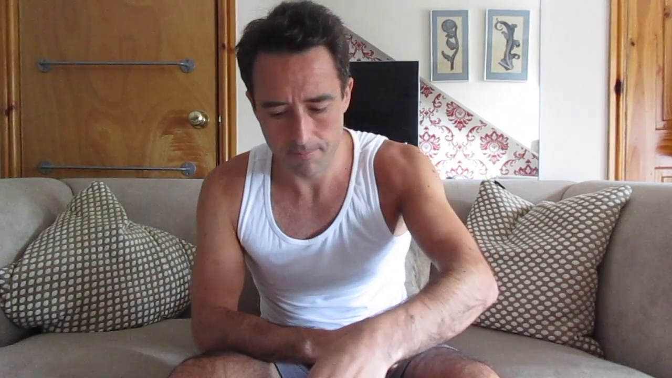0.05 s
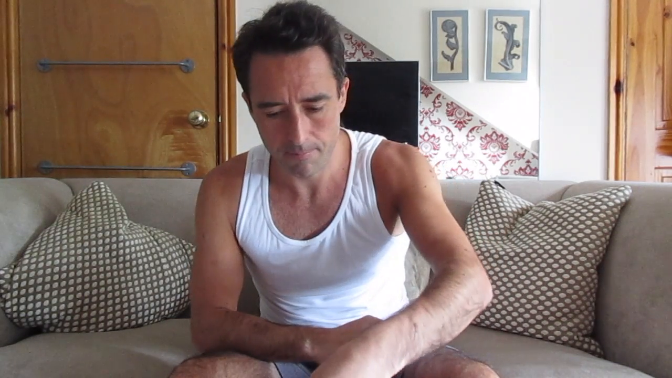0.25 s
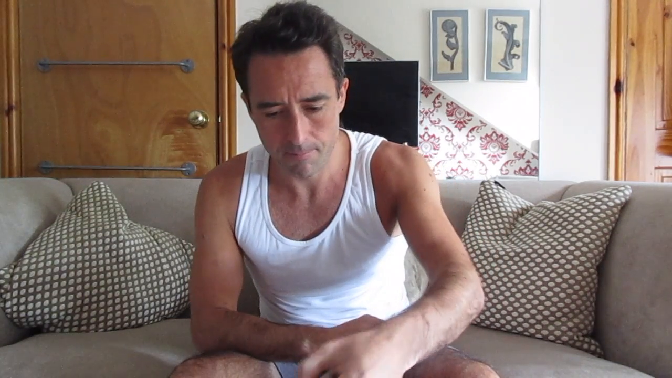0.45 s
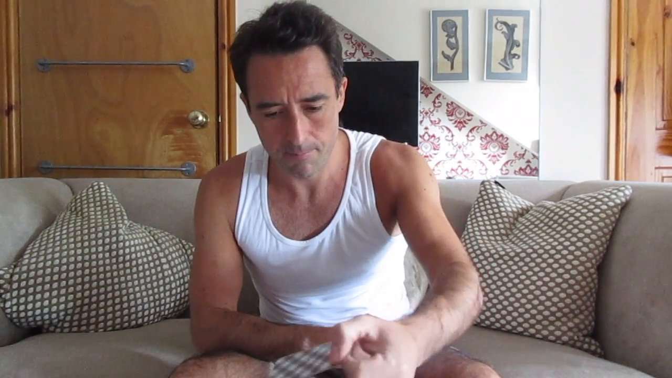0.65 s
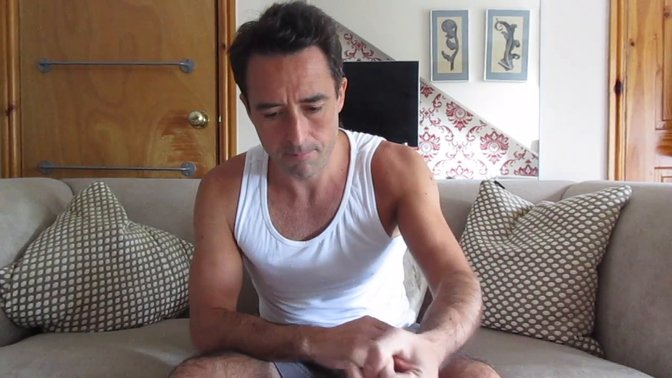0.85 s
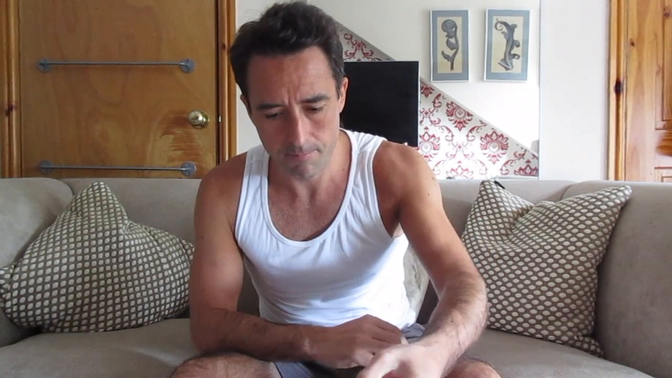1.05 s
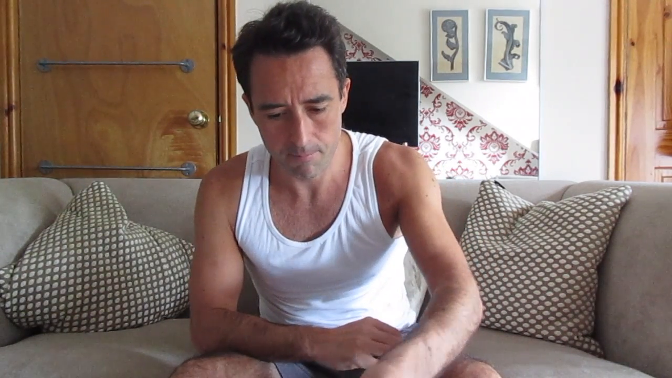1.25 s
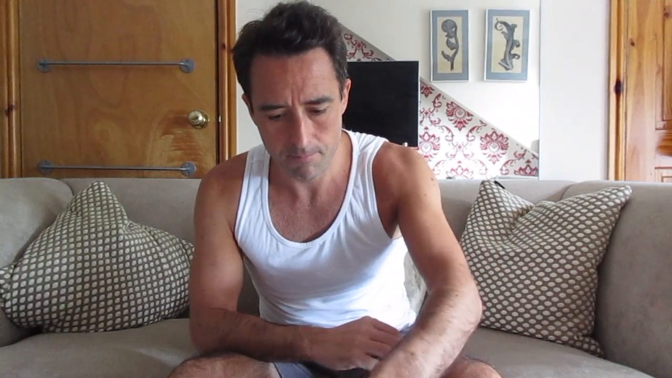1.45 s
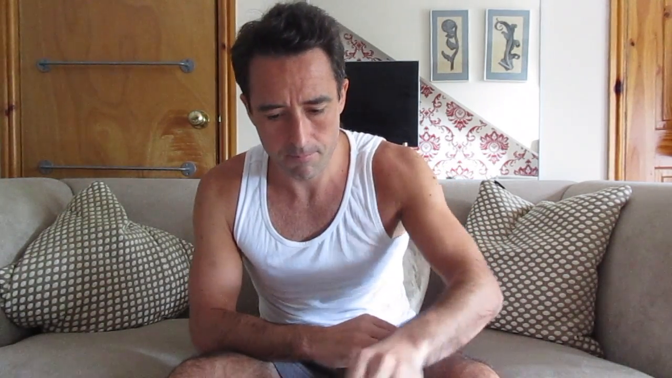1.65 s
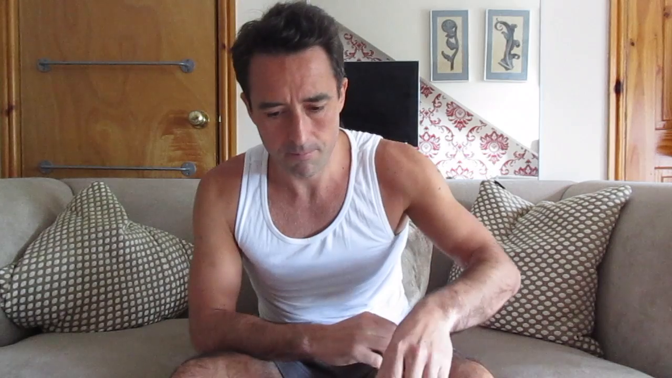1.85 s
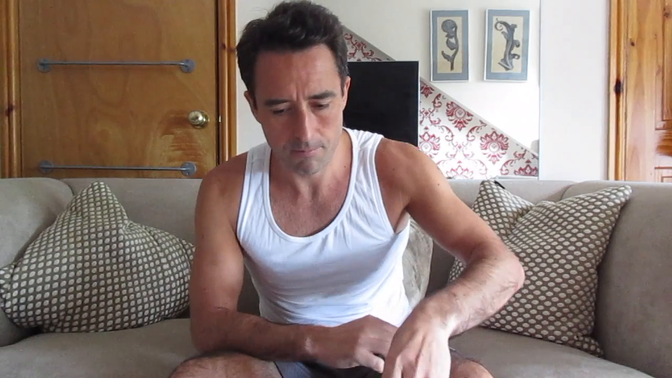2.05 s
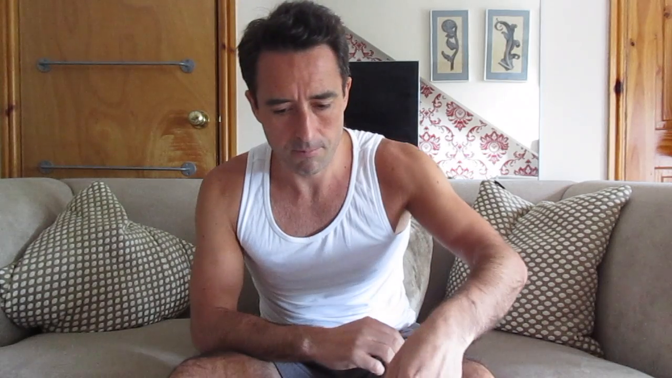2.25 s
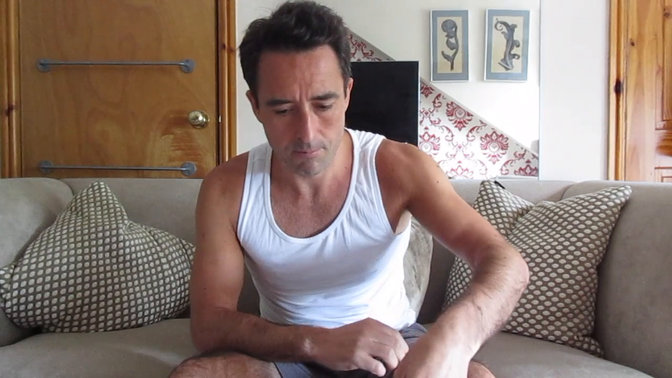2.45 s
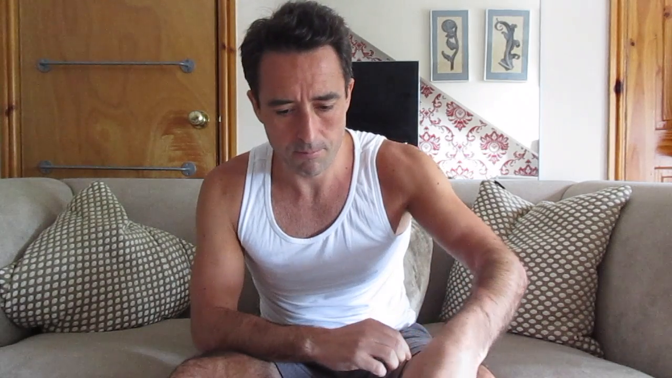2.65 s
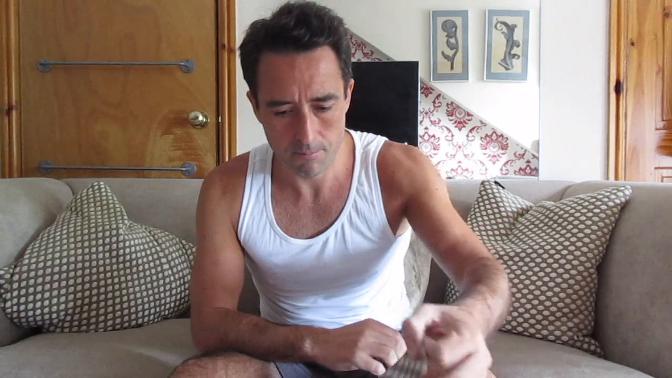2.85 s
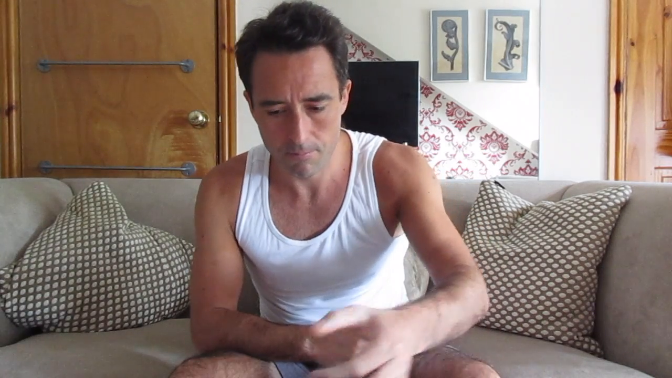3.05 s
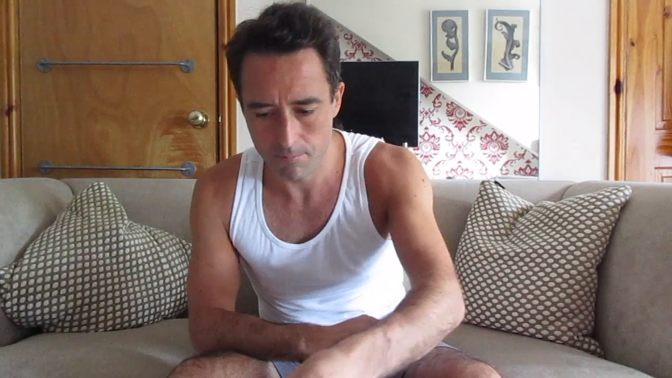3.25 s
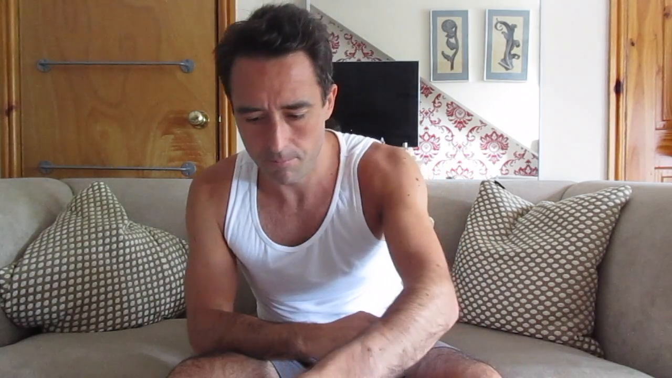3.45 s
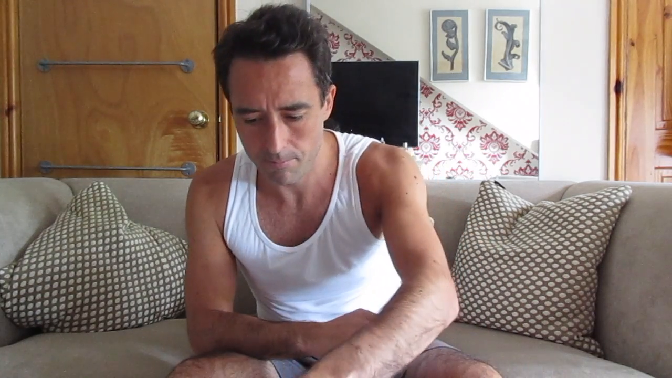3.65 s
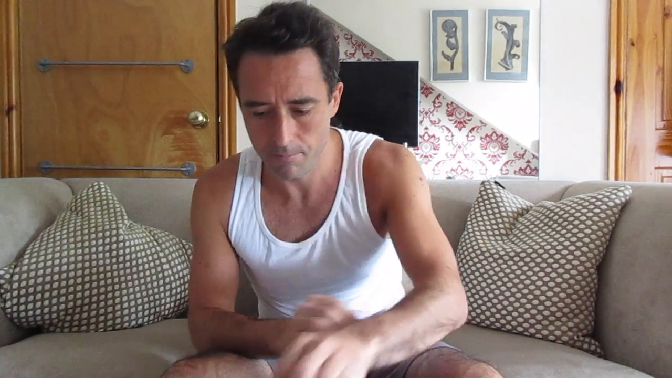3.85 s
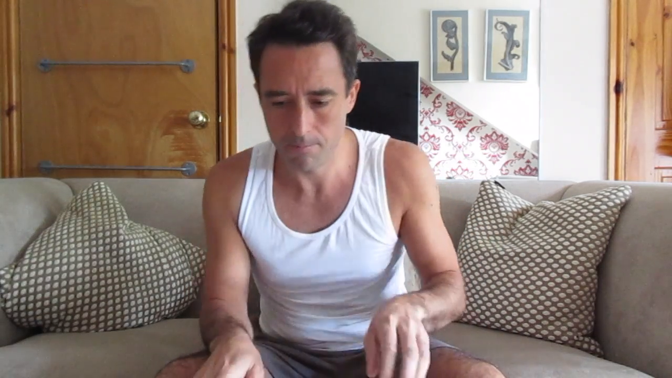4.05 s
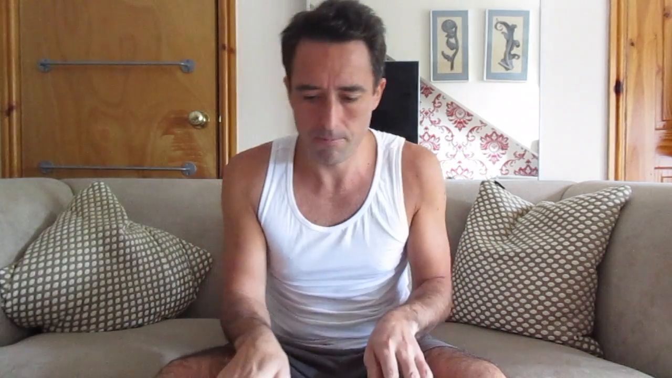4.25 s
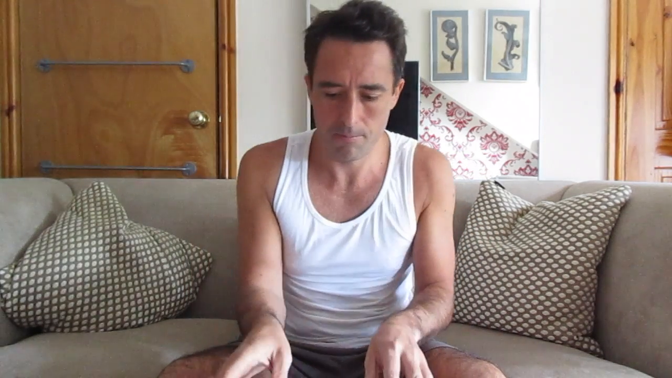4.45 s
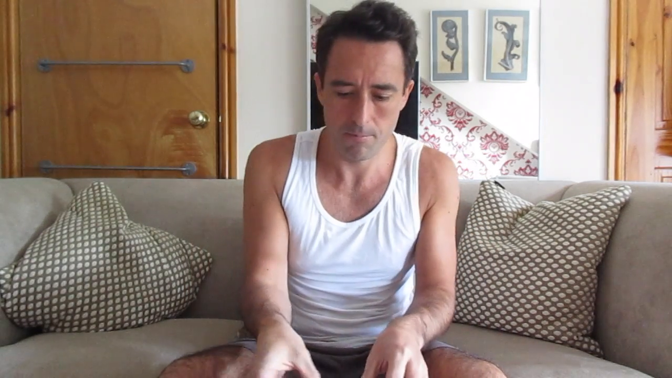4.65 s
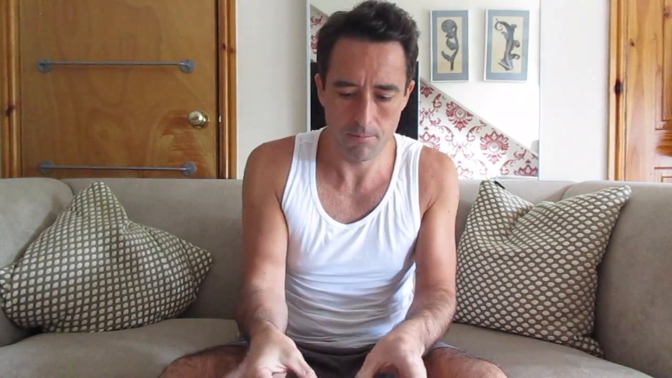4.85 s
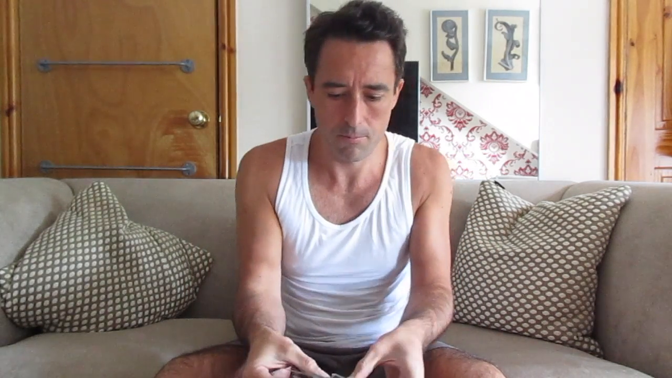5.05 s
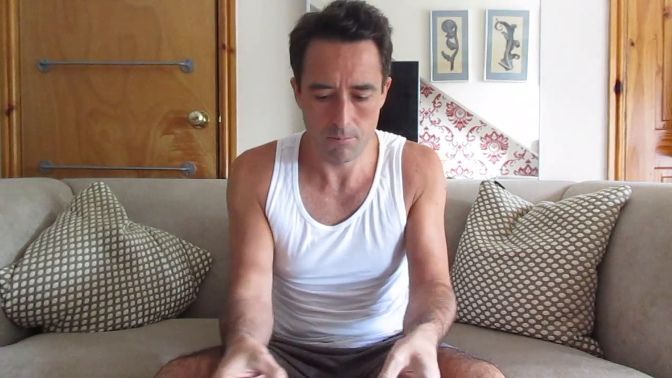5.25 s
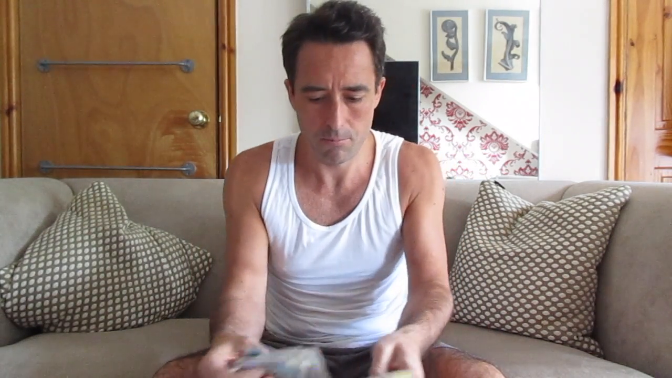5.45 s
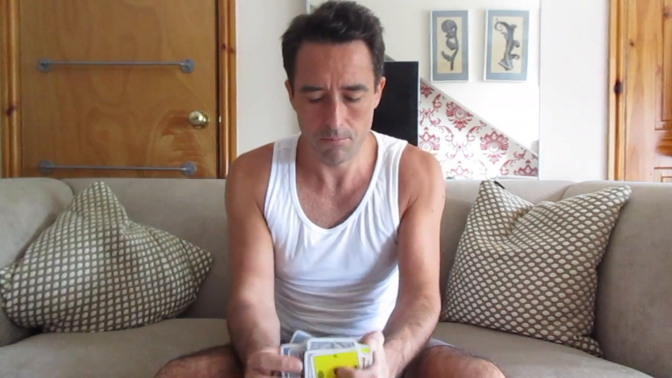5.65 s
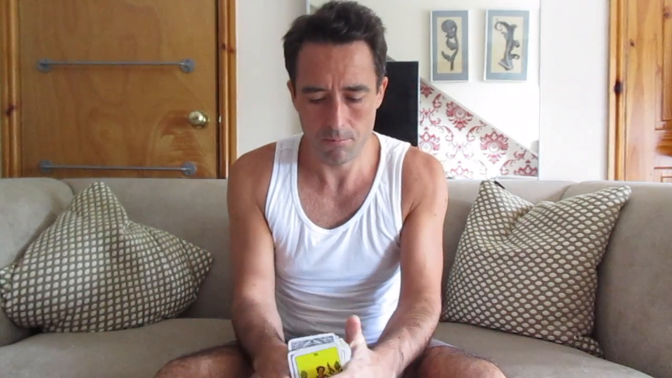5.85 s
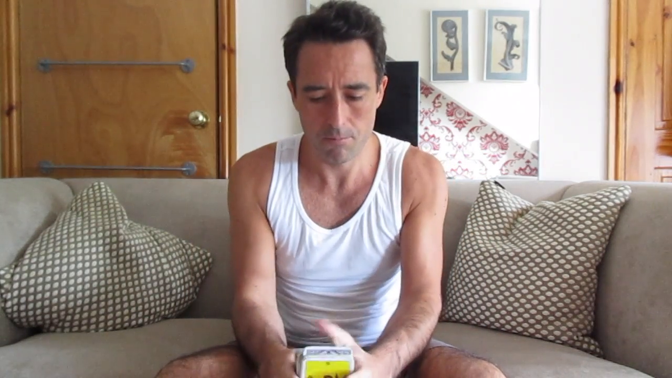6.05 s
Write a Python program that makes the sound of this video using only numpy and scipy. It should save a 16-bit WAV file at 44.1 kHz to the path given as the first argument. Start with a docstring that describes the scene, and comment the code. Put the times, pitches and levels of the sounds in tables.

```python
"""Stiff cards rasp softly as they are drawn from a deck and slid over a low wooden table in a quiet room.
Their paper fibres catch and slip, their corners tick, and they swish as they scrape off each other.
Twice a card is snapped down flat. Then the cards are swept together and the pack is knocked square,
making the table top ring close to the microphone. The furnished room adds a short echo and a faint hum."""
import sys
import numpy as np
from scipy import signal
from scipy.fft import rfft, irfft
from scipy.io import wavfile
from scipy.ndimage import uniform_filter1d

SR = 44100
rng = np.random.default_rng(int(sys.argv[2]) if len(sys.argv) > 2 else 0)


def bounce(signal):
    """Save signal as a 16-bit WAV file at the path given by the first command-line argument."""
    frames = np.transpose(np.atleast_2d(signal))
    limited = np.clip(frames, -1, 1)
    pcm = np.round(limited * 32767).astype(np.int16)
    wavfile.write(sys.argv[1], SR, pcm)


N = 269892
TIME, FREQ = np.arange(N) / SR, np.fft.rfftfreq(N, 1 / SR)

# The tone of a card's hissing edge: pitch_hz, level_db
EDGE_HISS = [(1000, -13), (3000, 5), (4500, 5), (7000, 4), (9500, 0.5), (12000, -3.5), (15000, -10.5)]
# The notes the table top rings with: pitch_hz, level_db, ring_s (time to fade by 60 dB)
TABLE_NOTES = [(231.2, -16, 0.18), (416.7, -23.5, 0.23), (497.3, -15, 0.1), (521.8, -10.5, 0.15),
               (673, -10, 0.025), (722, 0.5, 0.039), (810, -5.5, 0.039), (1102, 2.5, 0.038),
               (1147, -4.5, 0.05), (1404, -23, 0.27), (1827, -24, 0.18), (2000, -8, 0.022),
               (2384, -2, 0.024), (2633, -18, 0.029)]


def amp(db):
    """Turns decibels into a gain."""
    return 10 ** (np.asarray(db) / 20)


def unit(x):
    """Scales a signal to an average power of 1."""
    return x / np.sqrt(np.mean(x ** 2) + 1e-20)


def read(points, hz):
    """Reads a curve through (pitch_hz, value) points, spacing the pitches by octaves."""
    pitches, values = np.transpose(points)
    return np.interp(np.log(hz + 1), np.log(pitches + 1), values)


def add(mix, start_s, sound):
    """Lays a sound into the mix at start_s."""
    part = mix[max(round(start_s * SR), 0):][:len(sound)]
    part += sound[:len(part)]


def colour(x, tone):
    """Shapes a full-length signal with a (pitch_hz, level_db) curve, then scales it to power 1."""
    return unit(irfft(rfft(x) * amp(read(tone, FREQ)), N))


def ring(notes, t):
    """A struck object rings with several fading notes at once."""
    return sum(amp(db - 60 * t / ring_s) * np.sin(2 * np.pi * hz * t) for hz, db, ring_s in notes)


def resonate(x, hz, width_hz):
    """Keeps a band of sound around the moving pitch hz."""
    turn = np.exp(2j * np.pi * np.cumsum(hz) / SR)
    decay = np.exp(-np.pi * width_hz / SR)
    band = signal.lfilter([(1 - decay) ** 2], [1, -2 * decay, decay ** 2], x / turn)
    return 2 * (turn * band).real


def swell(t, length_s, rise_share, shape):
    """A movement speeds up until t = 0, then slows; shape 1 is pointed, 2 is rounded."""
    from_peak = np.maximum(-t / (rise_share * length_s), t / ((1 - rise_share) * length_s))
    return np.exp(-from_peak ** shape)


def friction(grain_db, per_s, smooth):
    """Paper fibres catch and let go: tiny slips of uneven size over a smooth hiss."""
    sizes = amp(grain_db * np.minimum(rng.exponential(1, N), 4))
    slips = (rng.random(N) < per_s / SR) * rng.choice([-1, 1], N) * sizes
    return unit(unit(slips) + smooth * rng.standard_normal(N))


def room_tone():
    """The steady background noise of the room, with a faint hum and an electrical whine."""
    # The tone of the background: pitch_hz, level_db
    air_tone = [(12, -20), (20, 9), (64, -9.5), (103, -5.5), (135, -8.5), (169, -8), (328, -13), (357, -12),
                (409, -15), (774, -14.5), (914, -16), (2280, -24), (7300, -31), (7930, -29), (15000, -40.5)]
    # A low drone, mains hum and a thin whine: pitch_hz, width_hz, level_db
    hums = [(40.5, 11, -58), (121.3, 5.5, -66.5), (7900, 92, -72)]
    out = amp(-48.92) * colour(rng.standard_normal(N), air_tone)
    for hz, width_hz, db in hums:
        band = 1 / (1 + (2 * (FREQ - hz) / width_hz) ** 2)
        out += amp(db) * unit(irfft(rfft(rng.standard_normal(N)) * band, N))
    return out


def hand_pushes():
    """Three loudness curves follow the hand's speed: card rasp, edge hiss and table rub."""
    # Each push of a card, before slides() sets the balance:
    # fastest_s, length_s, rasp_db, hiss_db, rub_db (the last two are added to rasp_db)
    pushes = [(0.177, 0.059, -47, -3.5, -16), (0.241, 0.027, -44.5, -13, -21), (0.335, 0.077, -43, -3, -26),
              (0.445, 0.12, -46.5, -3.5, -3), (0.817, 0.082, -51, -2, -3), (0.935, 0.018, -40, 2, -16),
              (1.375, 0.085, -40.5, -10.5, -24), (1.434, 0.025, -38, -2.5, -4.5),
              (1.493, 0.033, -52, 6.5, -3), (1.972, 0.078, -57.5, 1, 1), (2.164, 0.096, -53.5, -2.5, -13),
              (2.53, 0.25, -56, 1, -20), (2.723, 0.095, -47, -2.5, -29), (2.99, 0.088, -55, -2, -4),
              (3.366, 0.065, -45.5, -3.5, -8), (3.565, 0.23, -47.5, -15, -9), (3.663, 0.037, -44.5, -3, -3),
              (3.741, 0.018, -58.5, 9, -14), (3.89, 0.39, -61, -1.5, -1), (4.29, 0.25, -51.5, -2, 0.5),
              (4.477, 0.063, -47.5, -6.5, 3.5), (4.556, 0.074, -37.5, -5, -8.5),
              (4.649, 0.12, -43.5, 0, 0.5), (4.694, 0.039, -48, 1.5, 3.5), (4.85, 0.17, -53, -5, 4.5),
              (5.032, 0.14, -56, 0, 4.5), (5.214, 0.11, -46, -3, -4.5), (5.398, 0.14, -51.5, -1.5, -6),
              (5.567, 0.12, -46, -3, -3), (5.782, 0.093, -42, -8.5, -5), (6.065, 0.11, -47, -7.5, 3)]
    levels = np.zeros((3, N))
    for fastest_s, length_s, db, hiss_db, rub_db in pushes:
        near = abs(TIME - fastest_s) < 2 * length_s
        speed = swell(TIME[near] - fastest_s, length_s, rise_share=0.48, shape=1.78)
        levels[:, near] += amp([[db], [db + hiss_db], [db + rub_db]]) * speed
    return levels


def slides(rasp_level, hiss_level, rub_level, waver_db=2.0):
    """Sliding cards drag unevenly: they rasp, their edges hiss, and the table murmurs under them."""
    # The tone of rasping paper: pitch_hz, level_db
    rasp_tone = [(200, -14.5), (600, -6.5), (1200, -3), (1800, -3), (2600, -0.5), (3400, -12), (4500, -11),
                 (7000, -27), (15000, -44)]
    grip = amp(waver_db * unit(uniform_filter1d(rng.standard_normal(N), size=400)))
    rasp = colour(friction(grain_db=4.5, per_s=3000, smooth=0.61), rasp_tone)
    hiss = colour(friction(grain_db=8.5, per_s=6600, smooth=1.0), EDGE_HISS)
    rub = friction(grain_db=5.0, per_s=810, smooth=0.58)
    wood = unit(signal.fftconvolve(rub, ring(TABLE_NOTES, TIME[:SR // 4]))[:N])
    return grip * (amp(-3.5) * rasp_level * rasp + amp(-2.5) * hiss_level * hiss
                   + amp(-1) * rub_level * wood)


def corner_ticks(rasp_level, chances_per_s=14, spread_db=2, chance_hz=3760, fade_s=0.00074):
    """A card's corner catches, then lets go with one click and a brief crumble of smaller slips."""
    # Corners letting go: start_s, level_db (as if the tick lasted one millisecond), pitch_hz
    timed_ticks = [(0.2294, -37, 3400), (0.4826, -30.5, 2020), (0.491, -43, 1480), (1.103, -35, 1420),
                   (1.162, -37.5, 1790), (1.2490, -29.5, 1180), (1.2543, -38, 3660), (1.4256, -27.5, 2370),
                   (1.462, -28, 2870), (2.6983, -39, 1760), (2.7649, -31, 1700), (2.838, -32.5, 2980),
                   (3.0322, -29.5, 5100), (3.052, -27.5, 3600), (3.2076, -43.5, 2870),
                   (3.3339, -33.5, 1630), (3.6402, -29.5, 1810), (3.6802, -34.5, 6060),
                   (4.182, -36.5, 2370), (4.9382, -30, 8000), (4.9393, -13, 1170), (5.184, -32, 1200),
                   (5.23, -32.5, 1620), (5.5563, -27, 2950), (5.6080, -34, 3200), (5.671, -28.5, 5260),
                   (5.686, -28, 3580), (5.961, -32.5, 2280), (5.9695, -28, 2520), (5.977, -28, 2200),
                   (6.001, -31, 3500), (6.046, -39, 3000), (6.115, -24, 2900)]
    # A moving card also ticks by chance, more loudly the harder it is pushed.
    caught = np.flatnonzero((rng.random(N) < chances_per_s / SR) & (rasp_level > amp(-60)))
    caught_db = 20 * np.log10(rasp_level[caught]) + spread_db * rng.standard_normal(N)[caught]
    chance_ticks = [(start_s, db, chance_hz) for start_s, db in zip(TIME[caught], caught_db)]
    out, t = np.zeros(N), TIME[:2048]
    for start_s, db, hz in timed_ticks + chance_ticks:
        slip = 0.44 * rng.standard_normal(len(t)) * (t / fade_s) * np.exp(-t / fade_s)
        slip[0] = 1  # the click
        bending_card = signal.lfilter(*signal.iirpeak(hz, Q=0.77, fs=SR), slip)
        tick = signal.lfilter(*signal.butter(2, 1.42 * hz, fs=SR), bending_card)
        add(out, start_s, amp(db) * tick * np.sqrt(SR / 1000) / np.linalg.norm(tick))
    return out


def swishes():
    """Short scrapes swell and die as a card comes free, and a card flutters briefly with some blows; the air
    gap under it glides in pitch."""
    # A card scrapes off its neighbour, or flutters with a blow (the rows at 3.056, 4.954 and 5.688): #
    # loudest_s, level_db, length_s, pitch_hz, glide_octaves_per_s, hiss_db (added to level_db)
    scrapes = [(0.332, -44, 0.056, 2600, 17, -15), (0.413, -39, 0.05, 2180, -12, -22),
               (0.826, -42, 0.025, 1720, 0, -6), (0.953, -36.5, .019, 2030, -4, -22),
               (1.415, -40, 0.022, 1800, -6, -17), (1.528, -47, 0.0076, 3320, 2, 4.5),
               (2.763, -33.5, 0.0091, 1750, -27, -11.5), (2.845, -32.5, 0.0077, 1550, -19, -10),
               (3.038, -34.5, 0.018, 1740, -7, -4), (3.056, -13, 0.0029, 1650, -8, -19),
               (3.574, -41, 0.037, 1900, 16, -14), (3.656, -26, 0.014, 2760, 10, -20),
               (4.592, -38, 0.015, 1180, 0, -10), (4.954, -31, 0.024, 1250, -12, -18),
               (5.562, -37.5, .012, 2380, 1, -10), (5.642, -36, 0.027, 2460, 19, -5),
               (5.688, -15.5, 0.0036, 2440, 2, -26), (5.793, -36, .008, 2230, 0, -18),
               (5.989, -34.5, 0.021, 2080, 20, -8.5)]
    scrape_tone = [(100, 11), (500, 2), (2800, -4.5), (4500, -4.0), (15000, -28)]  # pitch_hz, level_db
    scrape = colour(friction(grain_db=2.5, per_s=9100, smooth=0.47), scrape_tone)
    hiss = colour(friction(grain_db=2.5, per_s=1300, smooth=0.65), EDGE_HISS)
    out = np.zeros(N)
    for loudest_s, db, length_s, hz, glide, hiss_db in scrapes:
        near = abs(TIME - loudest_s) < 0.1
        t = TIME[near] - loudest_s
        gap_hz = hz * 2 ** np.clip(glide * t, -1, 1)
        air_gap = unit(resonate(scrape[near], gap_hz, width_hz=1050))
        loudness = amp(db) * swell(t, length_s, rise_share=0.46, shape=0.86)
        out[near] += loudness * (air_gap + amp(hiss_db) * hiss[near])
    return out


def blows(hits, notes, rattle_s, press_s, low_cut_hz):
    """Each hit rings the notes and rattles the card; a softer contact leaves out the high notes."""
    out, t = np.zeros(N), TIME[:SR // 4]
    # A small surface gives off little bass.
    low_cut = signal.butter(4, low_cut_hz, "high", fs=SR, output="sos")
    for start_s, db, brightness_hz, rattle_db in hits:
        rattle = amp(rattle_db) * rng.standard_normal(len(t)) * np.exp(-t / rattle_s)
        strike = (ring(notes, t) + rattle) * (1 - np.exp(-t / press_s))
        contact = signal.butter(3, brightness_hz, fs=SR, output="sos")
        blow = signal.sosfilt(low_cut, signal.sosfilt(contact, strike))
        add(out, start_s, amp(db) * blow / abs(blow).max())
    return out


def table_knocks():
    """The pack's edge or a knuckle knocks on the table and sets the wood ringing; the card snapped down at 4.94
    s rings it too."""
    # Knocks on the wood, and at 4.9392 the second snapped card ringing the table top: start_s, level_db,
    # brightness_hz, rattle_db
    hits = [(0.484, -34.5, 900, 20), (1.252, -36, 1030, -1), (1.437, -28.5, 410, -11),
            (1.463, -30, 423, -12), (4.893, -34, 540, -14), (4.9392, -24, 1420, 35),
            (4.942, -25.5, 420, -8), (5.6410, -3, 1140, -25), (5.6668, -4.5, 1580, -15),
            (5.6732, -5, 1500, -12), (5.6775, -17, 1490, -17), (5.6820, -11, 2310, 18),
            (5.6850, 1, 2580, 4), (5.7893, -15, 1930, 2), (5.8066, -19.5, 1300, -13),
            (5.8278, -15, 1143, -17), (5.9843, -18, 2000, 11.5), (5.9903, -20.5, 1840, 3),
            (6.0005, -11.5, 950, -18), (6.0165, -20.5, 615, 6), (6.0245, -25.5, 990, -12),
            (6.112, -25, 1020, 11)]
    return blows(hits, TABLE_NOTES, rattle_s=0.003, press_s=0.00071, low_cut_hz=354)


def card_slaps():
    """A card is snapped flat and smacks against the wood."""
    # The card landing: start_s, level_db, brightness_hz, rattle_db
    hits = [(3.029, -20.5, 790, 24), (3.0522, -14, 2600, 5), (3.0548, -6, 1120, -17), (3.0578, -8, 1910, 4),
            (4.9388, -21, 1180, -7)]
    # The notes of card on wood: pitch_hz, level_db, ring_s
    slap_notes = [(151, -26, 0.058), (325, -12, 0.096), (404, -12.5, 0.067), (606, -15, 0.065),
                  (747, 5, 0.027), (984, 2.5, 0.012), (1140, 10.5, 0.012), (1370, -3.5, 0.023),
                  (1780, -1.5, 0.042), (2070, 7, 0.027), (2290, 9, 0.019), (2900, -12, 0.012)]
    return blows(hits, slap_notes, rattle_s=0.0049, press_s=0.00049, low_cut_hz=127)


def room_echo(x, build_s=0.006):
    """Scattered echoes build up and die quickly among the soft furniture."""
    # How long the echo takes to fade by 60 dB: pitch_hz, fade_s
    fade_times = [(150, 0.11), (500, 0.12), (1200, 0.26), (2500, 0.15), (6000, 0.19), (14000, 0.095)]
    # How strongly the room answers: pitch_hz, level_db
    echo_tone = [(150, -15), (500, -2), (1100, -9.5), (2300, -2.5), (5000, -4.5), (14000, -2.5)]
    size = SR // 2
    bounces = rng.choice([-1., 1.], size) * (rng.random(size) < 0.12)
    bounces *= 1 - np.exp(-(TIME[:size] / build_s) ** 2)
    hz, t, bands = signal.stft(unit(bounces), SR, nperseg=256)
    fade_rate = np.log(1000) / read(fade_times, hz)[:, None]
    fade = np.exp(-fade_rate * t) * np.sqrt(2 * fade_rate / SR)  # equal energy for long and short fades
    tail = signal.istft(bands * fade * amp(read(echo_tone, hz))[:, None], SR, nperseg=256)[1]
    return signal.fftconvolve(x, tail)[:N]


def scene():
    """Cards and table in the room; the knocks are nearest the microphone, so they echo least."""
    rasp_level, hiss_level, rub_level = hand_pushes()
    paper = slides(rasp_level, hiss_level, rub_level) + swishes() + corner_ticks(rasp_level)
    slaps, knocks = card_slaps(), table_knocks()
    echo = room_echo(amp(-1) * paper + amp(-4.5) * slaps + amp(-8) * knocks)
    out = paper + slaps + knocks + echo + room_tone()
    add(out, 0.0295, amp(-22) * (slaps + knocks))  # one late echo from the ceiling
    return out[None]


def record(dry, dip_above_db=-13.5, dip_share=0.39, recover_db_per_s=6, react_s=0.04):
    """The microphone cuts rumble, its volume control dips after loud knocks, and top treble is cut."""
    heard = signal.sosfilt(signal.butter(8, 36, "high", fs=SR, output="sos"), dry)
    power_db = 10 * np.log10(abs(uniform_filter1d(heard[0] ** 2, size=441)) + 1e-12)
    recovery_db = recover_db_per_s * TIME
    held_peak_db = np.maximum.accumulate(power_db + recovery_db) - recovery_db
    over_db = np.maximum(held_peak_db - dip_above_db, 0)
    lag = np.exp(-1 / (react_s * SR))
    dip_db = dip_share * signal.lfilter([1 - lag], [1, -lag], over_db)
    clipped = np.clip(heard / amp(dip_db), -1, 1)
    treble_cut = signal.firwin(511, cutoff=15200, window=("kaiser", 9), fs=SR)
    return signal.oaconvolve(clipped, treble_cut[None], "same")


dry = scene()
out = record(dry)
bounce(out)
```